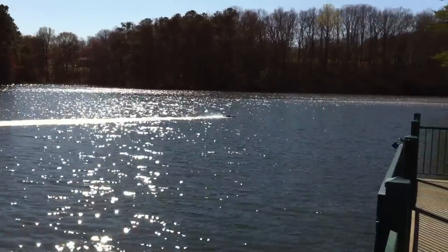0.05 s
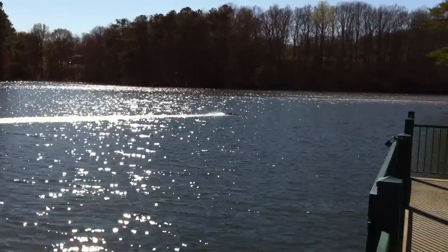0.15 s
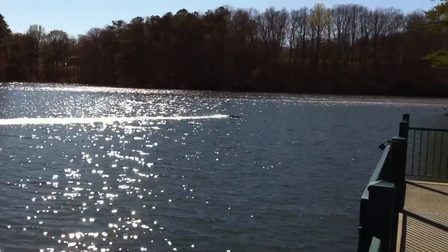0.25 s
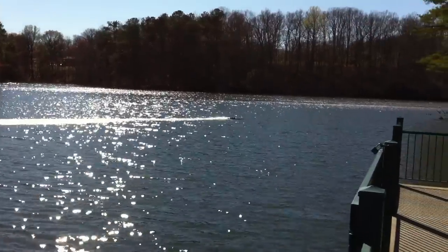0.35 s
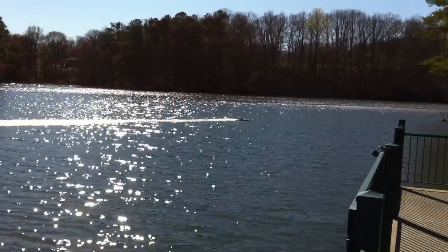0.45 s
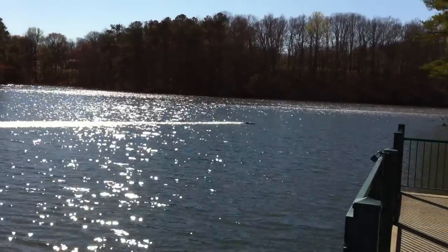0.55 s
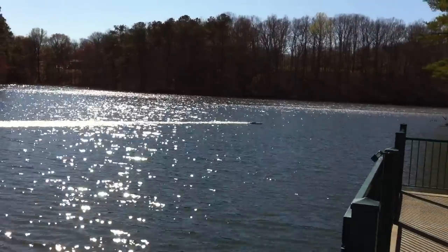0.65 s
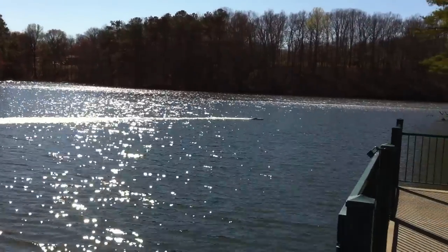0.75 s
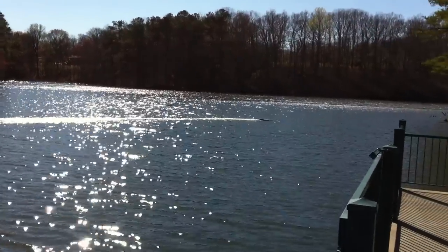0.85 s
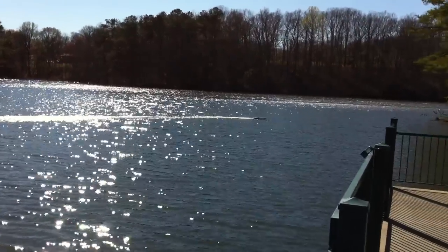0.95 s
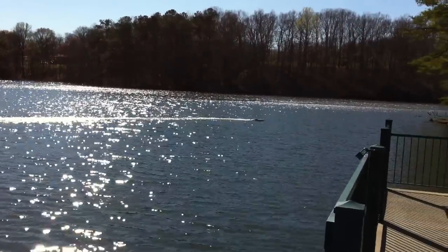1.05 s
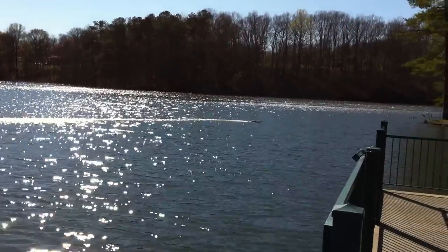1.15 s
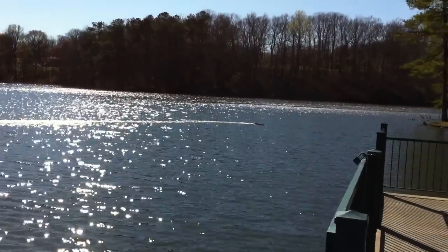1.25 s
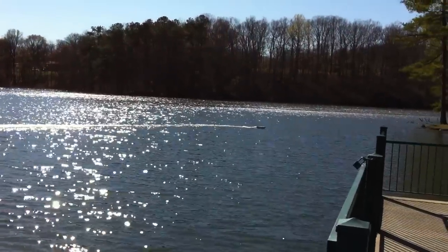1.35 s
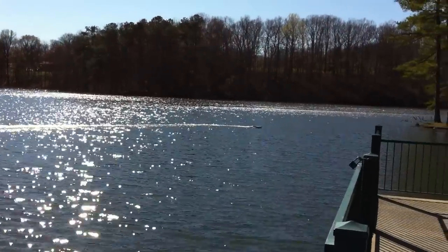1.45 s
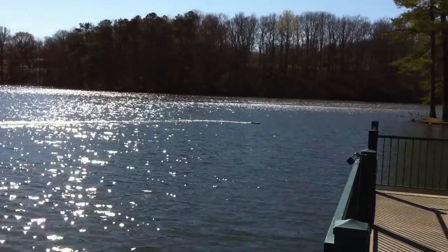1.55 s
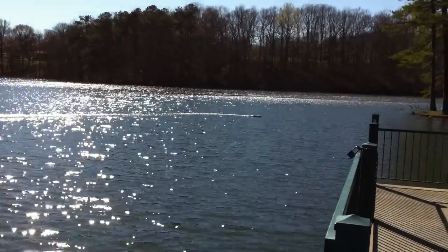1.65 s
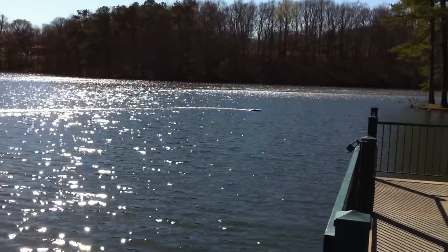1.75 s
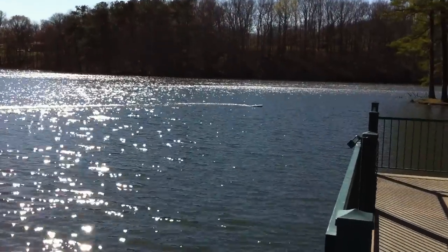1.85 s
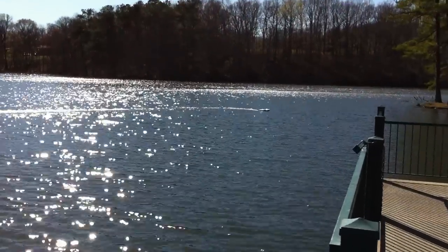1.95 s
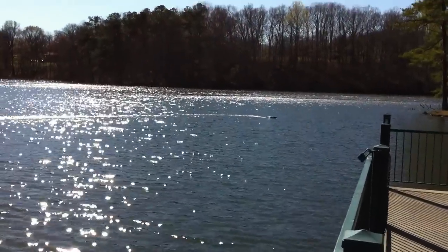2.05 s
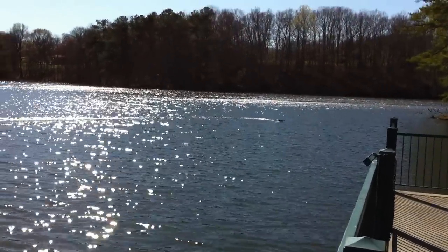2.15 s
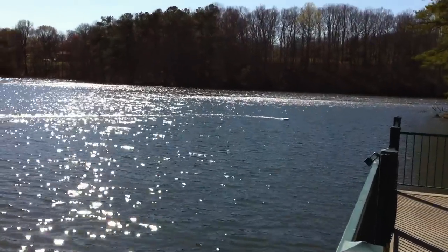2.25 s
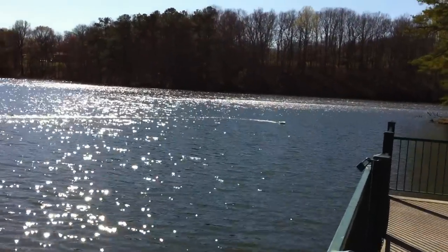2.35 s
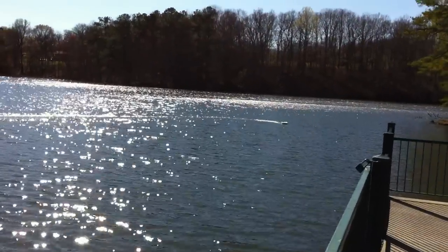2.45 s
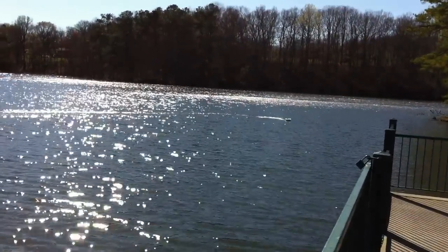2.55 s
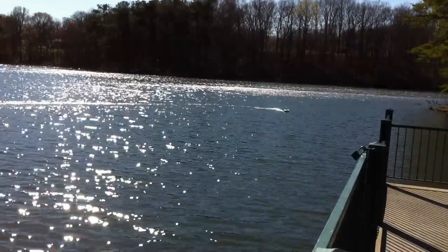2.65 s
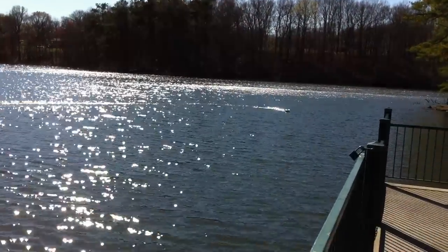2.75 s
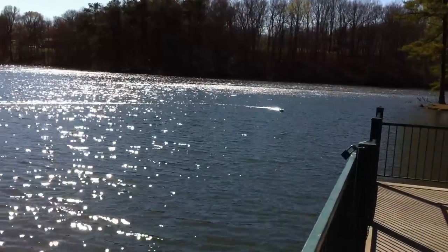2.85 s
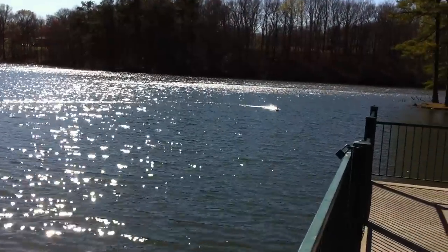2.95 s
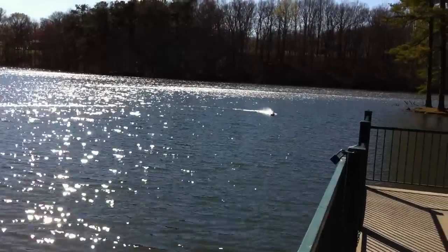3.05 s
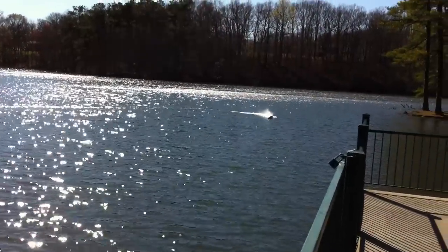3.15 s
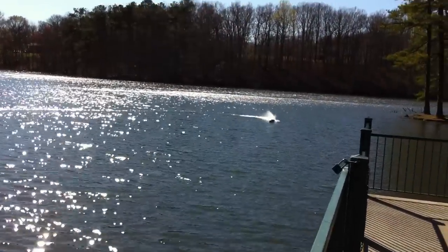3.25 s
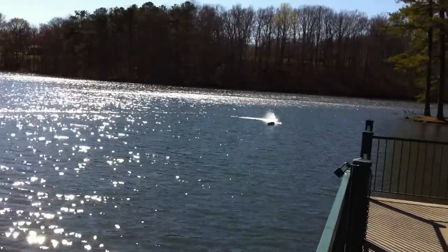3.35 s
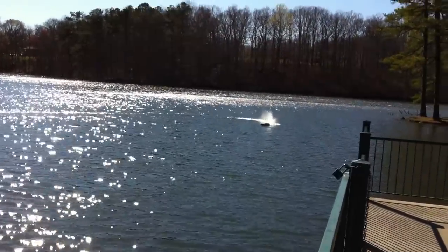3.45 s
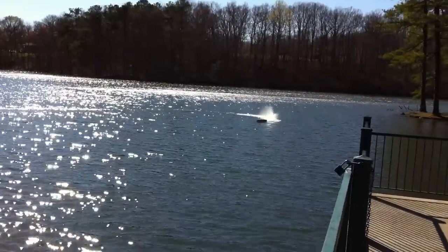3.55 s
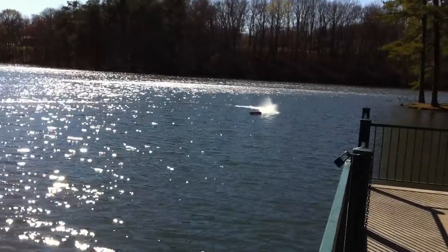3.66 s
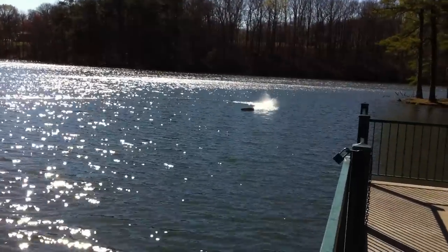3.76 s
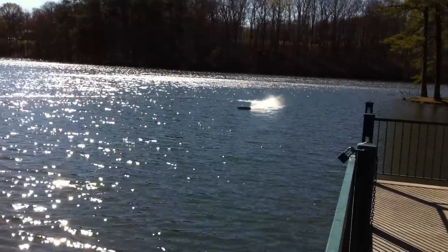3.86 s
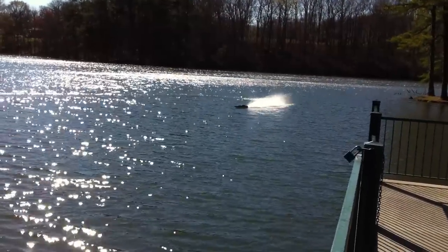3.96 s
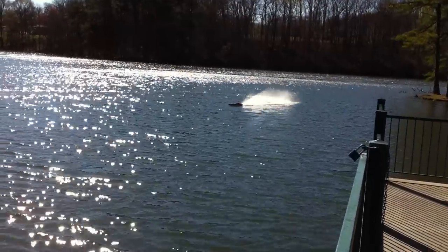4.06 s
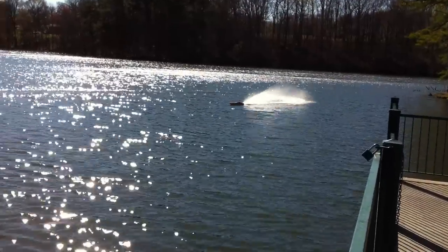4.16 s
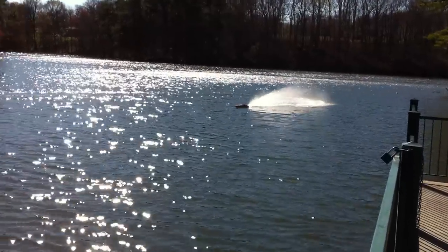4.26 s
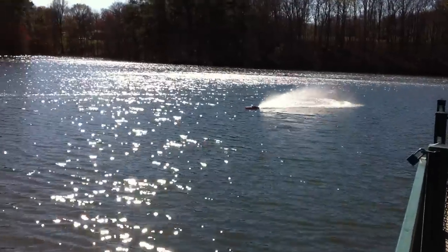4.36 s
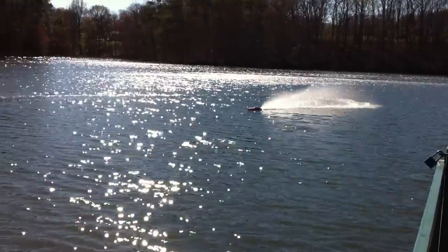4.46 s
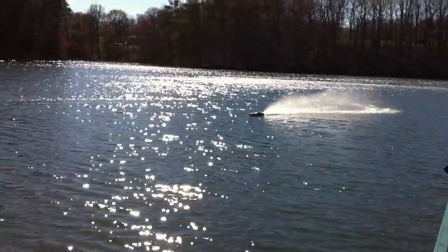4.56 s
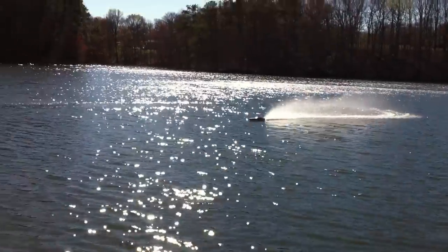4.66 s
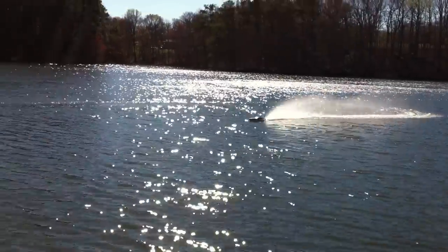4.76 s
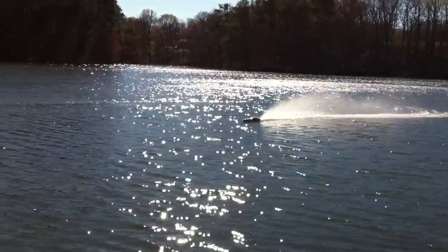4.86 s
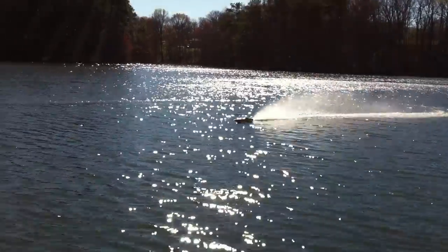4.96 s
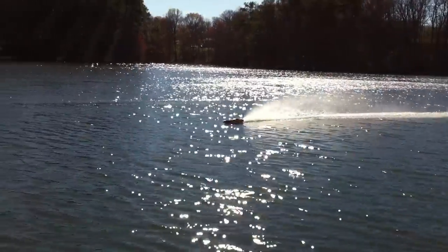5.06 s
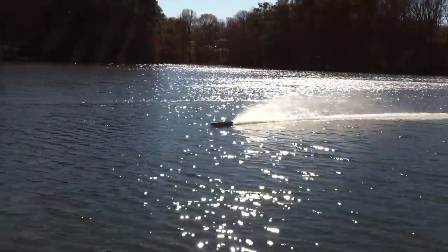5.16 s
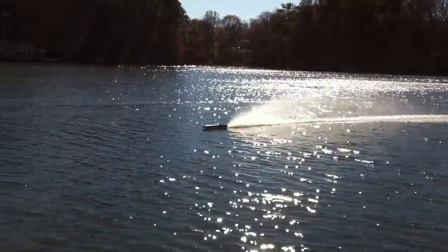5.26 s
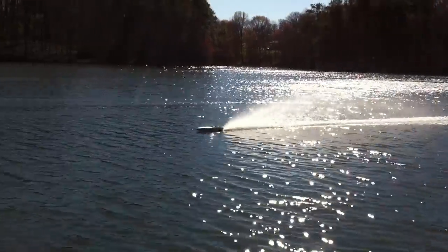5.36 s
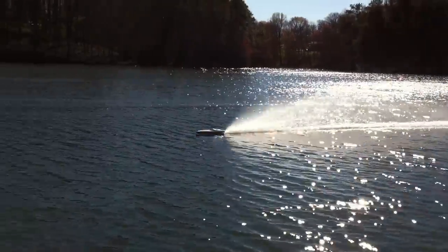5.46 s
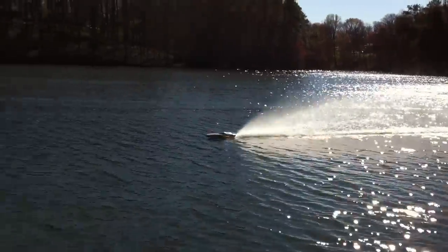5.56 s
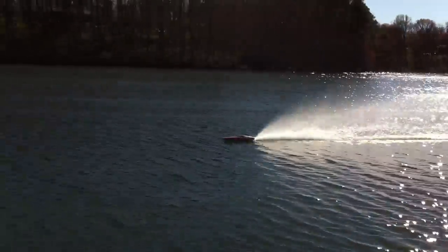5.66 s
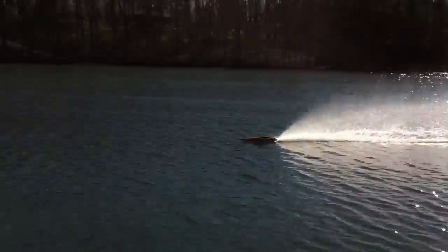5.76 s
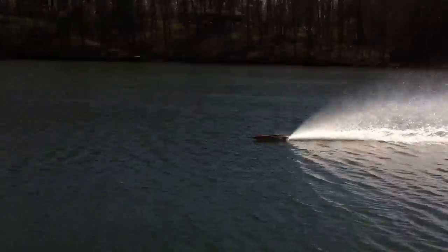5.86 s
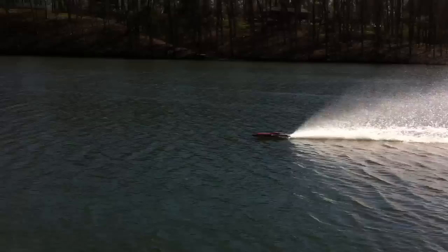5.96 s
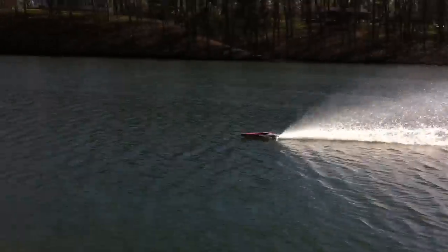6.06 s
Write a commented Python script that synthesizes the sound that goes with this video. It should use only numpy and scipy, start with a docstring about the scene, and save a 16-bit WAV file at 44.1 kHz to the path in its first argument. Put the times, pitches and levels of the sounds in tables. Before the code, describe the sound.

Faint wash and low wind thumps over open water, distant splashes, then a model speedboat whines nearer, swelling suddenly as its spray hisses past.

```python
"""Model speedboat approaching a dock

A small electric model speedboat turns far out on a lake, then races in towards the dock.
Its two-bladed propeller whines and churns: harmonics of one shaft speed, smeared by random modulation.
The hull's rush and the hiss of the rooster tail are coloured noise that grows as the distance shrinks.
Behind lies filtered noise for a breeze over water and trees; puffs of wind bump the microphone,
as short low swings, and one tiny tick is a decaying noise burst."""
import sys
import numpy as np
from scipy import signal
from scipy.fft import rfft, irfft
from scipy.io import wavfile
from scipy.ndimage import uniform_filter1d

SR = 44100
rng = np.random.default_rng(int(sys.argv[2]) if len(sys.argv) > 2 else 0)


def put_to_file(sound):
    """Save the sound as 16-bit audio at rate SR, in the file named by the first command-line argument."""
    columns = np.atleast_2d(sound).T  # one column per channel
    safe = np.clip(columns, -1, 1)
    whole_steps = np.round(safe * 32767)
    wavfile.write(sys.argv[1], SR, whole_steps.astype(np.int16))


N = 269892
TIME = np.arange(N) / SR  # s


def amp(db):
    """Decibel law: converts a level in dB to an amplitude gain."""
    return 10 ** (np.asarray(db) / 20)


def unit(x):
    """Normalisation: scales a signal to a root-mean-square value of one."""
    return x / np.sqrt(np.mean(abs(x) ** 2) + 1e-20)


def curve(points):
    """Linear interpolation: a curve through (t/s, value) points, at every sample."""
    return np.interp(TIME, *np.transpose(points))


def ramp(start, length):
    """Linear onset: rises from 0 to 1 over length seconds."""
    return np.clip((TIME - start) / length, 0, 1)


def bell(centre, width):
    """Gaussian envelope: one at centre, with a standard deviation of width seconds."""
    return np.exp(-0.5 * ((TIME - centre) / width) ** 2)


def filtered(x, spectrum):
    """Linear filtering: applies a response drawn on a log-frequency axis."""
    hz, db = np.transpose(spectrum)
    bins = np.fft.rfftfreq(2 * N, 1 / SR)
    response = amp(np.interp(np.log(bins + 1), np.log(hz), db))
    return irfft(rfft(x, 2 * N) * response)[:N]


def colour(x, spectrum):
    """Spectral shaping: gives noise a spectrum, at unit rms."""
    return unit(filtered(x, spectrum))


def wander(hz, order=2):
    """Low-pass noise: random drift at unit rms, with little faster than hz."""
    bins = np.fft.rfftfreq(N, 1 / SR)
    low_pass = 1 / np.sqrt(1 + (bins / hz) ** (2 * order))
    return unit(irfft(rfft(rng.standard_normal(N)) * low_pass, N))


def patchy(x, depth_db):
    """Time-frequency modulation: small patches of the spectrogram swell and fade."""
    z = signal.stft(x, nperseg=512, noverlap=384)[2].T
    patches = uniform_filter1d(rng.standard_normal(z.shape), 14, axis=0)  # along time
    patches = unit(uniform_filter1d(patches, 6, axis=1))  # along frequency
    modulated = (z * amp(depth_db * patches)).T
    return signal.istft(modulated, nperseg=512, noverlap=384)[1][:N]


def droplets(per_s, spread_db, share):
    """Shot noise: single larger drops hold a share of the power, a haze of tiny ones the rest."""
    sizes = amp(spread_db * np.minimum(rng.exponential(1, N), 4))
    impulses = sizes * rng.choice([-1, 1], N)
    drops = unit(impulses * (rng.random(N) < per_s / SR))
    haze = rng.standard_normal(N)
    return np.sqrt(share) * drops + np.sqrt(1 - share) * haze


# relative spectrum of the wind over water and trees: (f/Hz, level/dB)
BREEZE_SPECTRUM = [(25, -46), (50, -23), (80, -18), (110, -5), (175, -1.5), (250, -6.5), (330, -10),
                   (600, -11.5), (900, -13), (1400, -16.5), (1900, -25), (2500, -32.5), (4000, -34),
                   (6500, -40.5), (15700, -41)]


def breeze(level_db=-50, split_hz=280, gust_db=1.7):
    """Broadband turbulence noise: a steady wash whose lowest part is lumpy, then slackens."""
    wash = amp(level_db) * colour(patchy(rng.standard_normal(N), depth_db=0.08), BREEZE_SPECTRUM)
    low = signal.sosfiltfilt(signal.butter(2, split_hz, fs=SR, output="sos"), wash)
    # the rumble on the microphone eases between two gains
    rumble_db, lull_db = 1.56, -2.5
    easing_db = rumble_db + (lull_db - rumble_db) * ramp(3.2, length=0.7)
    return wash - low + low * amp(easing_db + gust_db * wander(11.0))


# puffs of wind, as peaks before the high-pass: (t/s at the peak, level/dB, f/Hz, Gaussian width t/s)
PUFFS = [(0.706, -36.5, 204.7, 0.0057), (0.76, -31, 202, .01), (1.02, -29.5, 165, 0.0046),
         (1.079, -35.5, 175, 0.016), (1.196, -24, 155, 0.0061), (1.259, -33.5, 210.3, 0.0045),
         (1.592, -33, 168, .0045), (1.629, -32, 161, .006), (3.05, -37.5, 131, 0.013),
         (3.43, -32.5, 161, 0.0038)]


def puffs(waver=0.166, ragged=0.33, edge_hz=70):
    """Pressure fluctuation of eddies: each pushes the microphone through a few uneven low swings."""
    drift = np.cumsum(1 + waver * wander(91)) / SR  # unevenly running time in s
    turbulence = 1 + ragged * wander(160, order=3)
    out = np.zeros(N)
    for peak_s, level_db, hz, width_s in PUFFS:
        tone = np.sin(2 * np.pi * (hz * drift + rng.random()))
        swing = turbulence * bell(peak_s, width_s) * tone
        out += amp(level_db) * swing / abs(swing).max()
    return signal.sosfiltfilt(signal.butter(3, edge_hz, "high", fs=SR, output="sos"), out)


def tick(start_s=1.025, level_db=-49.02, centre_hz=12000, decay_s=0.0011):
    """Exponential decay: a very short burst of high noise near the microphone."""
    spectrum = [(centre_hz / 2, -28), (centre_hz, 0), (centre_hz * 2, -24)]
    burst = colour(rng.standard_normal(N), spectrum)
    decay = (TIME >= start_s) * np.exp(-abs(TIME - start_s) / decay_s)
    return amp(level_db) * burst * decay  # the level is the rms at the onset


# the boat runs out, turns and comes back: (t/s, distance/m)
DISTANCE = [(0, 36.4), (1.0, 49.7), (1.65, 127), (2.4, 56.4), (3.65, 44.2), (4.25, 32.5), (4.75, 27.2),
            (5.0, 22.3), (5.5, 14.2), (6.12, 7.5)]


def heard(level_db, loss_db_per_m=0, reference_m=10):
    """Spherical spreading with absorption: gain of a boat sound whose level holds at reference_m."""
    distance = curve(DISTANCE)
    return reference_m / distance * amp(level_db - loss_db_per_m * (distance - reference_m))


def splash(peak_s, hold_s, rise_s=0.13, fall_db_per_s=100):
    """Attack, hold and decay: a sheet of water swells to full strength, holds and falls back."""
    late = np.maximum(TIME - peak_s - hold_s, 0)
    return ramp(peak_s - rise_s, rise_s) * amp(-fall_db_per_s * late)


# relative spectra of the hull's rush, the rooster tail and its mist: (f/Hz, level/dB)
RUSH_SPECTRUM = [(100, -38), (250, -3.5), (420, -1.5), (530, -13.5), (680, 4.5), (950, 3), (1200, 0.5),
                 (1550, 0.5), (2200, -4.5), (2800, -17), (4000, -32)]
SPRAY_SPECTRUM = [(1500, -28), (2300, -36), (2850, -9.5), (3400, 1.5), (4300, 1), (5200, -5), (5800, -13),
                  (7200, -10), (9000, -22), (15000, -54)]
MIST_SPECTRUM = [(4000, -17), (6000, 1.5), (7400, 3), (9000, -2), (10500, -0.5), (12700, 1), (14200, -3),
                 (15700, -1)]
# sheets of water thrown up around the turn:
# (t/s at full strength, hold t/s, hull rush level/dB, spray level/dB)
SPLASHES = [(1.923, 0.16, -61, -61.5), (2.38, 0.14, -66, -64.5), (2.516, 0.078, -49, -58.5),
            (2.747, 0.18, -63, -54.5), (2.984, 0.33, -60, -60)]


def water(slap_db=0.64):
    """Incoherent flow noise: rush, spray and mist grow on approach; sheets of water add as powers."""
    astern = 1 - ramp(2.26, length=0.4)  # falls to 0 as the bow swings round towards the dock
    # levels at the reference distance; rush and spray are quieter while the boat heads away
    rush_gain = heard(-38 - 5 * astern)
    # the treble fades faster with distance
    spray_gain = heard(-41 - 4.5 * astern, loss_db_per_m=0.28)
    mist_gain = heard(-42, loss_db_per_m=0.45)
    for peak_s, hold_s, rush_db, spray_db in SPLASHES:
        sheet = splash(peak_s, hold_s)
        rush_gain = np.hypot(rush_gain, amp(rush_db) * sheet)
        spray_gain = np.hypot(spray_gain, amp(spray_db) * sheet)
    cloud = amp(-68) * bell(3.0, width=0.18)  # fine drops that the turn leaves behind
    mist_gain = np.hypot(mist_gain, cloud)
    rush = rush_gain * colour(patchy(rng.standard_normal(N), depth_db=2.0), RUSH_SPECTRUM)
    spray = spray_gain * colour(patchy(droplets(3000, 3.5, 0.46), depth_db=1.5), SPRAY_SPECTRUM)
    mist = mist_gain * colour(patchy(droplets(3000, 4.5, 0.16), depth_db=1.5), MIST_SPECTRUM)
    return (rush + spray + mist) * amp(slap_db * wander(43))  # pulses as the hull skips


# shaft speed as heard, sagging and then rising on the run in: (t/s, turns per second f/Hz)
SHAFT_SPEED = [(2.6, 316.5), (2.76, 363.3), (2.98, 382.4), (3.27, 373), (3.58, 346), (3.95, 332.5),
               (4.05, 311.1), (4.42, 316.6), (4.68, 310), (4.95, 322.2), (5.32, 357.4), (5.5, 381.6),
               (5.63, 389.4), (5.8, 419.4), (6.0, 436.7), (6.12, 429)]
# how much the blades churn in and out of the water: (t/s, roughness 0-1)
CHURN = [(2.6, 0.54), (3.4, 0.04), (4.9, 0.32), (5.28, 0.37), (5.5, 0.72), (5.76, 0.19), (6.12, .2)]
# shaft's own hum, once a turn: (t/s, level/dB)
HUM_LEVEL = [(2.65, -62.5), (2.93, -57), (3.15, -69), (3.5, -53), (3.95, -51), (4.05, -45.5), (5.15, -43),
             (6.12, -58)]
# blade beat, twice a turn, leaping as the boat nears the dock: (t/s, level/dB)
BEAT_LEVEL = [(2.68, -51.5), (3.2, -50.5), (3.3, -45), (3.75, -46), (3.93, -53.5), (4.1, -47),
              (4.35, -42.5), (4.52, -49), (5.12, -41), (5.5, -38), (5.78, -21), (6.03, -18.5), (6.12, -22)]
# octave of the beat: (t/s, level/dB)
OCTAVE_LEVEL = [(2.7, -72), (2.93, -58.5), (3.15, -65), (3.55, -56.5), (4.35, -51), (4.55, -41),
                (4.75, -49.5), (4.97, -48.5), (5.25, -54), (5.8, -38.5), (6.12, -34.5)]
# third harmonic of the beat, the edge of the whine: (t/s, level/dB)
EDGE_LEVEL = [(2.9, -68.5), (3.9, -67.5), (4.25, -59), (5.0, -70), (5.55, -48.5), (5.85, -54.5),
              (6.12, -64)]
# weaker shaft orders, relative to the bow-on swell: (multiple of the shaft speed, level/dB)
OVERTONES = [(3, -8), (5, -16), (10, -15), (12, -16)]


def propeller(jitter=0.00211, churn_hz=65, flutter_db=1.5, hum_smear=0.34, octave_smear=0.92):
    """Harmonics of rotation: orders of one wavering speed, smeared by the changing bite of the blades."""
    rough = np.clip(curve(CHURN), 0, 1)
    speed = curve(SHAFT_SPEED) * (1 + jitter * wander(20))
    angle = 2 * np.pi * np.cumsum(speed) / SR
    # the overtones swell while the bow points at the dock
    bow_on_s = 4.5
    distance = curve(DISTANCE)
    spreading = np.interp(bow_on_s, TIME, distance) / distance
    ahead = amp(-56) * bell(bow_on_s, width=1.4) * spreading
    # (shaft order, gain, smear)
    orders = [(1, amp(curve(HUM_LEVEL)), hum_smear * rough),  # the hum stays cleaner
              (2, amp(curve(BEAT_LEVEL)), rough),
              (4, amp(curve(OCTAVE_LEVEL)), octave_smear * rough),
              (6, amp(curve(EDGE_LEVEL)), rough)]
    orders += [(round(order), amp(db) * ahead, rough) for order, db in OVERTONES]
    whine = np.zeros(N)
    for order, gain, smear in orders:
        churn = wander(churn_hz) + 1j * wander(churn_hz)
        churn = unit(churn - uniform_filter1d(churn, size=2400))  # a quick rattle, without long gaps
        bite = np.sqrt(np.maximum(1 - smear ** 2, 0)) + smear * churn
        whine += gain * np.sqrt(2) * (bite * np.exp(1j * order * angle)).real
    # the whine comes through at the end of the turn; the hull skipping on ripples shakes it
    return whine * ramp(2.61, length=0.03) * amp(flutter_db * wander(23))


def scene():
    """Superposition: the boat and the air around the dock add in one channel."""
    return (breeze() + puffs() + tick() + water() + propeller())[None]


# response of the microphone, losing deep bass and dipping slightly at the top: (f/Hz, level/dB)
MICROPHONE_RESPONSE = [(30, -7), (60, -4.5), (100, -1), (200, -0.5), (2400, 0), (2830, 0), (3300, -0.5),
                       (15800, -1.5)]


def record(dry, edge_hz=15870):
    """Band limitation: the microphone's response, then a steep linear-phase low-pass."""
    low_pass = signal.firwin(1601, edge_hz, window=("kaiser", 9), fs=SR)
    return signal.oaconvolve(filtered(dry[0], MICROPHONE_RESPONSE), low_pass, "same")[None]


dry = scene()
out = record(dry)
put_to_file(out)
```